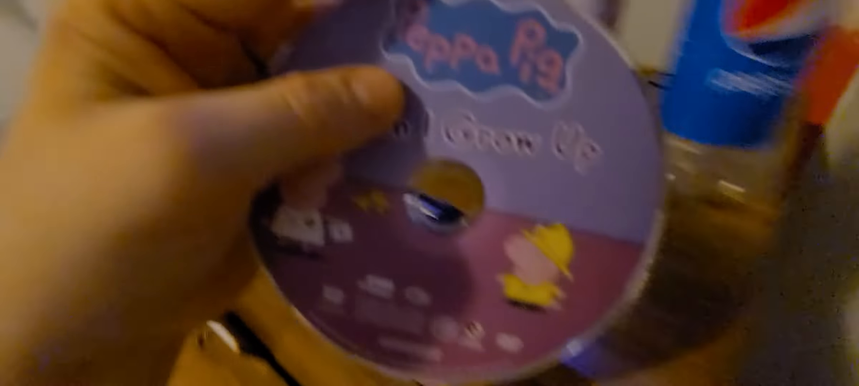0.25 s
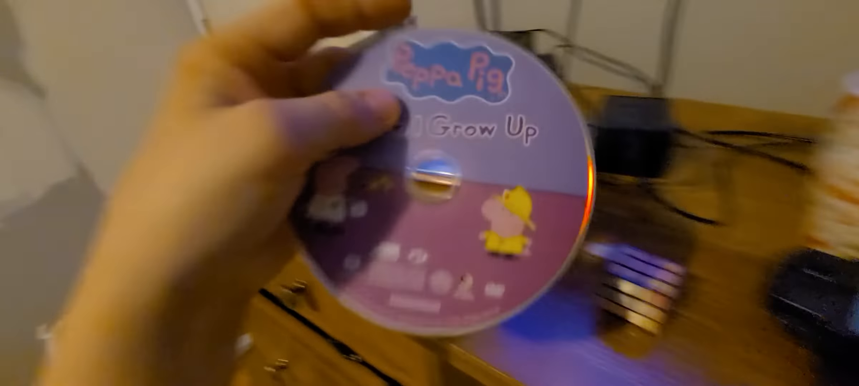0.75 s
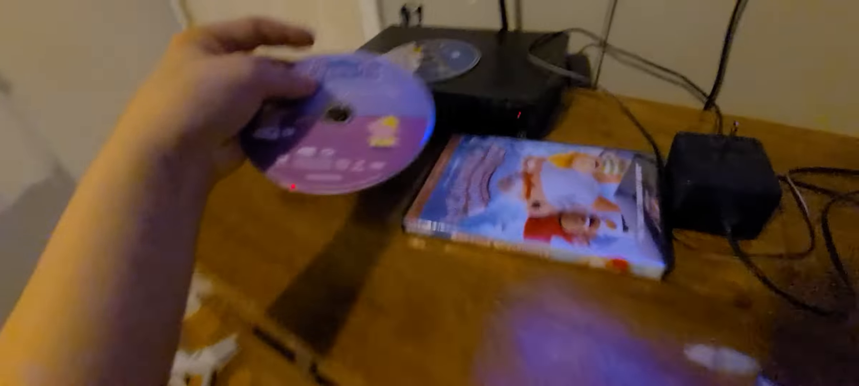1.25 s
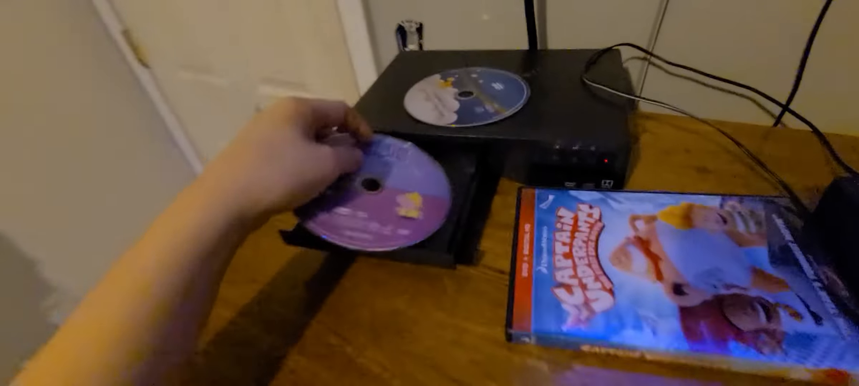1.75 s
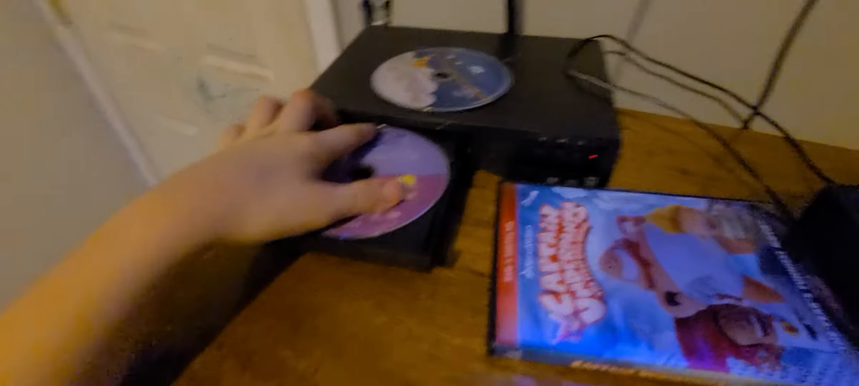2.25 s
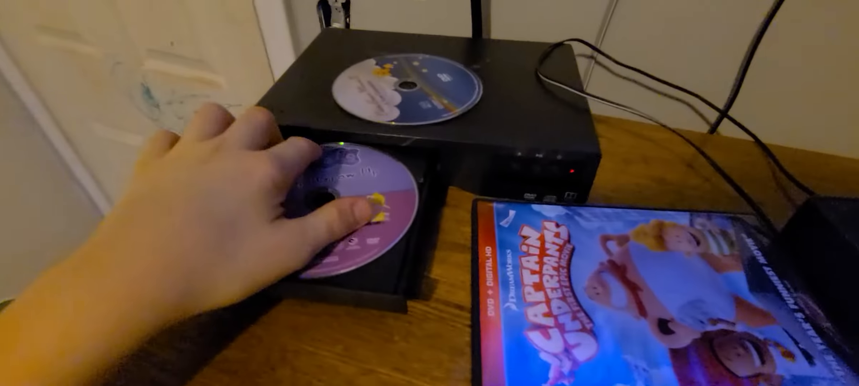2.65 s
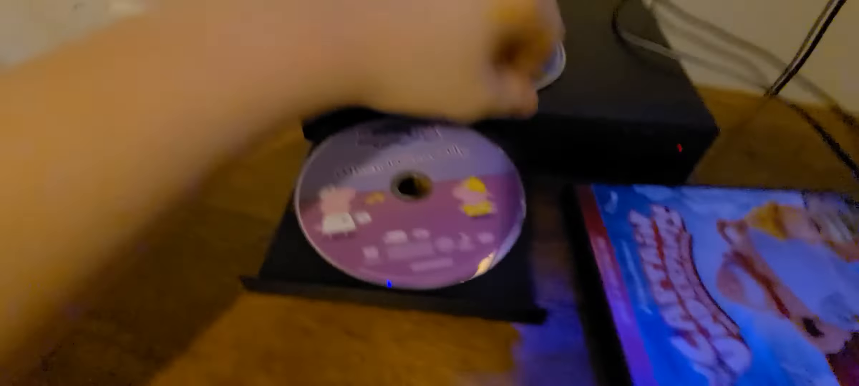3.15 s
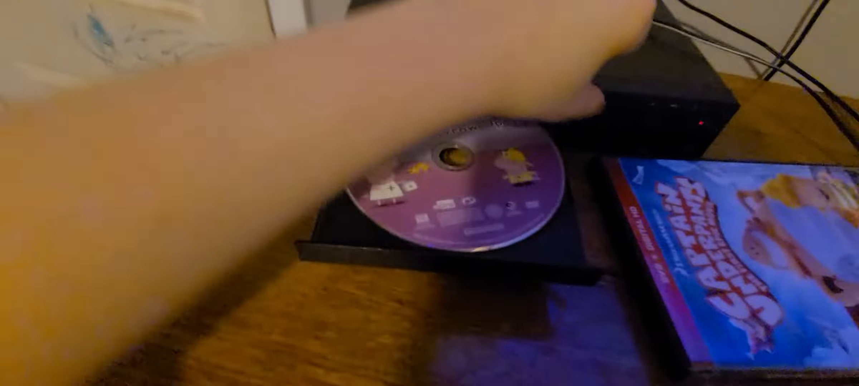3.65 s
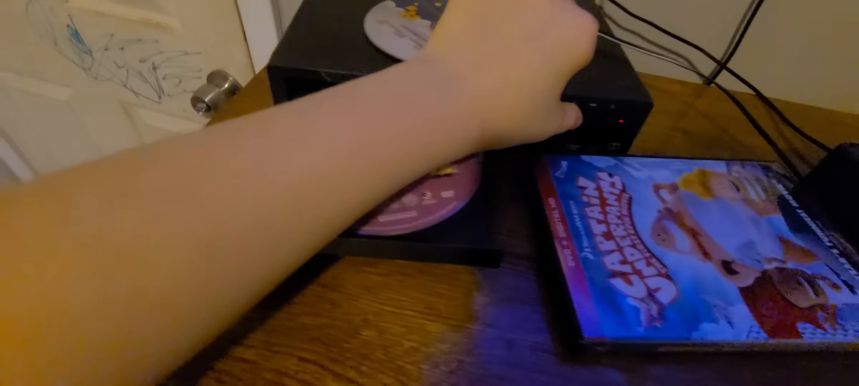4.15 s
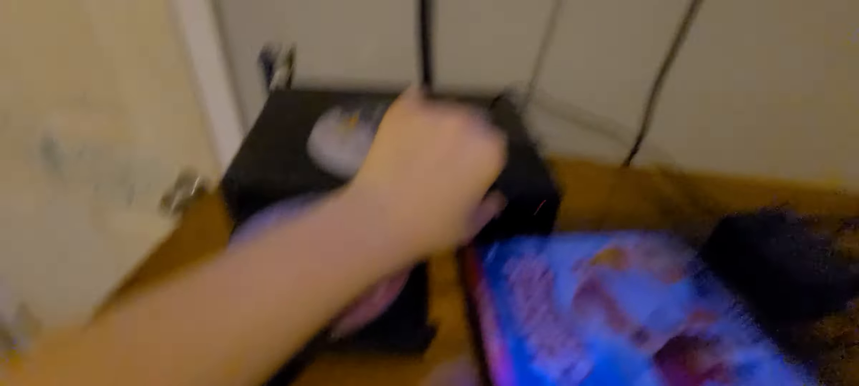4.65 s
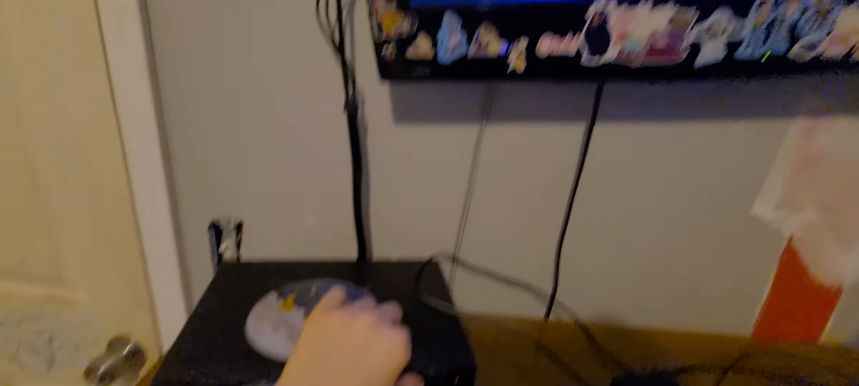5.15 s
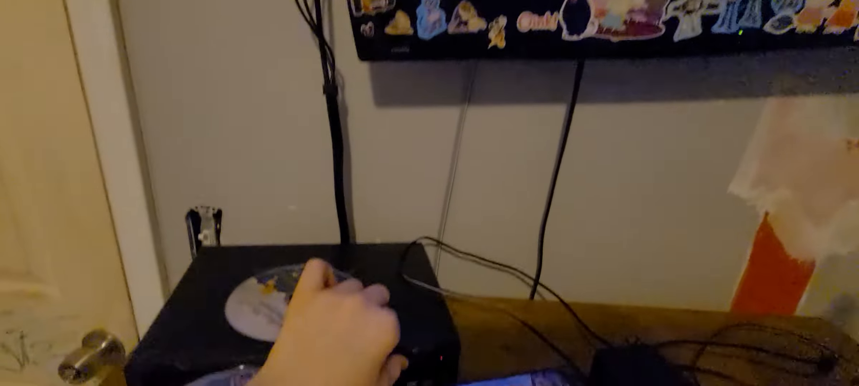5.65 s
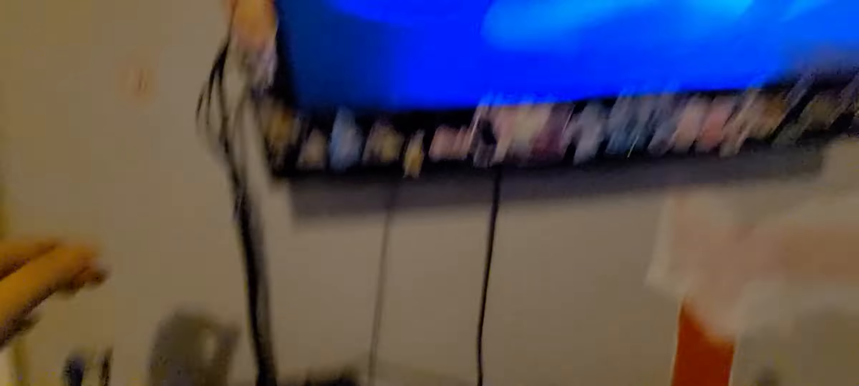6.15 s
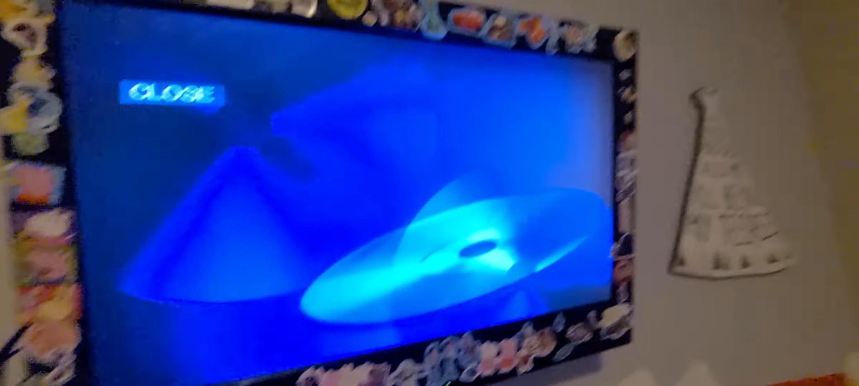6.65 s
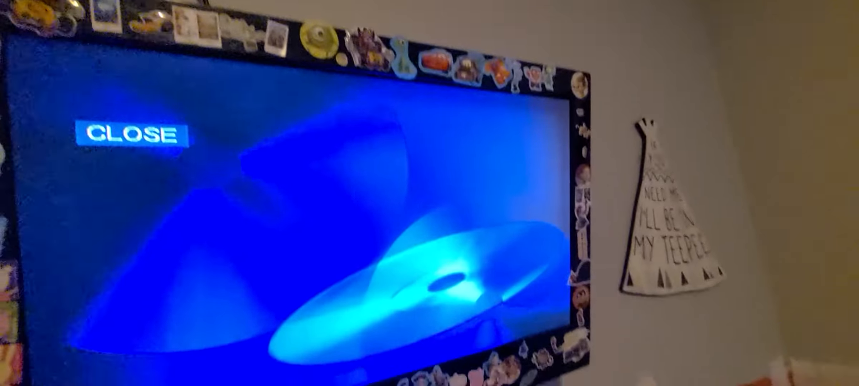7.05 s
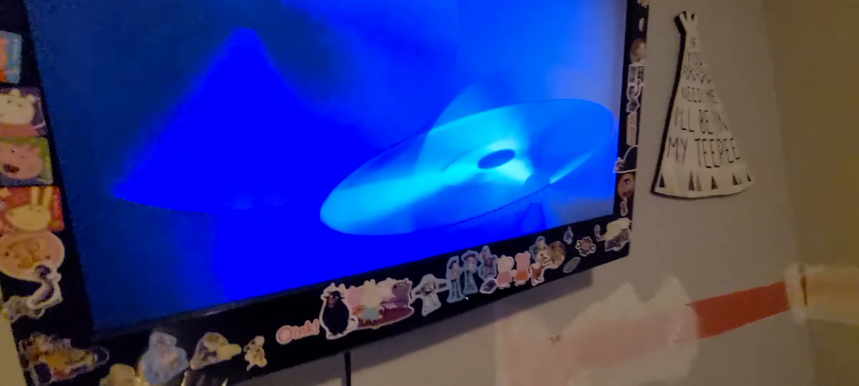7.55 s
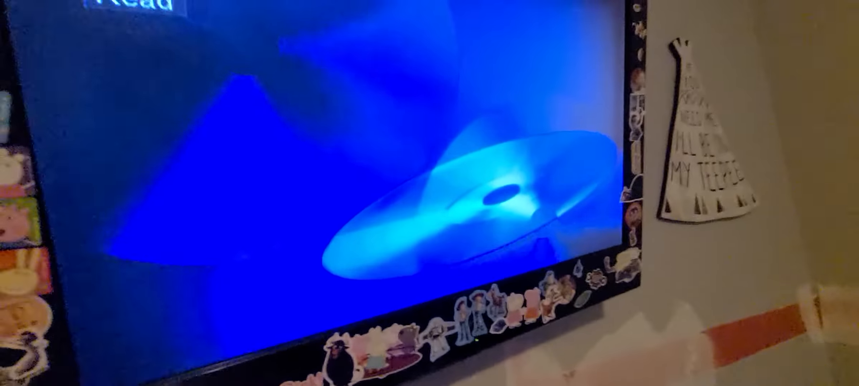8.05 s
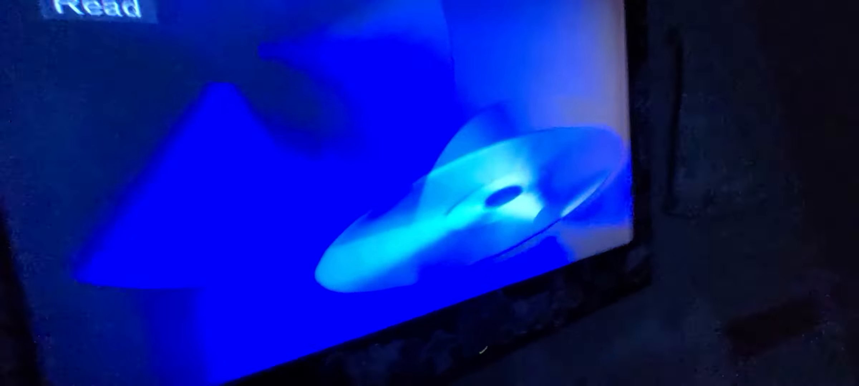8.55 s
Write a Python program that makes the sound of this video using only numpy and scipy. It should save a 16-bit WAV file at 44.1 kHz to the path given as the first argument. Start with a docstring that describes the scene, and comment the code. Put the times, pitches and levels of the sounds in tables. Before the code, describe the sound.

A small, quiet room heard close through a handheld phone, with low rumble, faint mains hum and soft hiss. At the start a disc rubs dryly along fingers, fading within half a second, with light taps and sleeve rustle, strongest near 1.2. At about 1.5 the disc gives a sharp double tick on a plastic tray, scrapes faintly, then from 1.9 to 2.05 clatters in a dense, bright plastic rattle with short ringing. Small taps come near 2.55 and 2.7, a soft cloth brush near 3.2, then near silence. At 5.6 a button snaps down, releasing at 5.74. Around 6.0 to 6.1 the mechanism knocks lightly, and a geared motor whirs, growing louder and slightly lower under load from 6.5, until it stops at about 7.2. Firm clunks land between 7.04 and 7.22. Weaker knocks, faint rustling and tiny taps follow, with a closer scuff at 8.75.

```python
"""A disc slides along fingers and clatters into a player's plastic tray, in a small quiet room.
The clatter is short bursts of noise that set plastic tones ringing; the sliding is countless tiny slips.
A button snaps, a geared motor whines and rattles, and gears, cam and clamp knock inside the player.
Fingers tap, clothes rustle as filtered slips, and a few bumps swing at one clear pitch.
A hand-held phone hears all this through two ports, with room echo, rumble, hum and faint hiss."""
import sys
import numpy as np
from scipy import signal
from scipy.fft import rfft, irfft
from scipy.io import wavfile
from scipy.ndimage import uniform_filter1d

SR = 44100
rng = np.random.default_rng(int(sys.argv[2]) if len(sys.argv) > 2 else 0)


def generate_wav(signal):
    """Clip the signal to [-1, 1] and save it as 16-bit WAV at the path in sys.argv[1]."""
    frames = np.transpose(np.atleast_2d(signal))
    scaled = np.clip(frames, -1, 1) * 32767
    pcm = np.round(scaled).astype(np.int16)
    wavfile.write(sys.argv[1], SR, pcm)


N = 387198
TIME = np.arange(N) / SR  # s

# In the four tables of blows, all levels are relative: each kind of blow shifts them further.
# The disc strikes the tray: (t/s, body level/dB, thud level/dB, tick level/dB)
DISC_HITS = [(1.4775, -16.5, -33.5, -21), (1.5013, -23.5, -35.5, -36.5), (1.773, -30, -48.5, -32),
             (1.9063, -20, -46, -21), (1.9108, -18.5, -39, -23.5), (1.9247, -14.5, -40.5, -19),
             (1.927, -14, -34.5, -15.5), (1.9416, -17, -30.5, -20.5), (1.9443, -14.5, -29, -21),
             (1.9571, -24.5, -34.5, -36), (1.9919, -20.5, -33, -18.5), (1.998, -15, -40.5, -19),
             (2.0073, -16.5, -38, -16), (2.0194, -20, -31, -23), (2.0314, -15, -39.5, -17),
             (2.0546, -26.5, -37.5, -36), (2.1792, -35.5, -55, -33), (2.3317, -39, -50, -34.5)]
# The button snaps down, its spring rattles, it snaps back:
# (t/s, body level/dB, thud level/dB, tick level/dB, chatter fade/s)
BUTTON_SNAPS = [(5.6145, -25, -43, -31, 0.006), (5.64, -38.5, -61, -41, 0.03),
                (5.7362, -21, -38.5, -38, 0.0027), (5.7682, -44, -46.5, -44, 0.0022)]
# Gears, cam and clamp knock inside the player:
# (t/s, body level/dB, thud level/dB, tick level/dB, chatter fade/s)
PLAYER_KNOCKS = [(5.9918, -40, -65, -53, 0.008), (6.0105, -30.5, -53, -58, 0.0099),
                 (6.049, -42, -59, -55, 0.015), (6.0774, -38.5, -52, -38, 0.0038),
                 (6.0876, -29, -46.5, -57, 0.0085), (6.1024, -45, -46.5, -60, 0.011),
                 (6.2774, -41.5, -53, -62, 0.003), (6.787, -38, -57, -44.5, 0.0029),
                 (7.0385, -22.5, -47.5, -40.5, 0.005), (7.069, -25.5, -45.5, -47, 0.01),
                 (7.1367, -31, -43, -45, 0.014), (7.1665, -24.5, -47, -42, 0.0032),
                 (7.2206, -47, -42, -69, 0.0086), (7.3682, -43.5, -61, -80, 0.0049),
                 (7.555, -39.5, -46.5, -50, 0.0085), (7.6704, -46, -59, -57.5, 0.0065),
                 (7.7675, -43, -58, -51.5, 0.0087)]
# Light taps of fingers and plastic: (t/s, body level/dB, thud level/dB, tick level/dB, chatter fade/s)
FINGER_TAPS = [(0.5602, -45, -53, -53, 0.014), (0.677, -45, -80, -48, 0.017),
               (0.7504, -42.5, -56, -56, 0.028), (0.9066, -46, -85, -43, 0.029),
               (1.1266, -46, -53, -47, 0.0065), (2.5508, -49, -43, -59.5, 0.0061),
               (2.7089, -45.5, -58, -55.5, 0.0044), (3.514, -57.5, -59.5, -68, 0.024),
               (3.6496, -68, -88, -64, 0.006), (3.781, -64, -67, -66.5, 0.011),
               (5.1453, -58, -59.5, -69, 0.02), (8.15, -56.5, -54.5, -61.5, 0.013),
               (8.224, -61, -54, -65, 0.011), (8.3754, -58.5, -76, -64, 0.0096),
               (8.5822, -52.5, -69.5, -52, 0.0058), (8.738, -44, -57, -54, 0.031)]
# Bumps and clunks of hand, desk and drive with one clear pitch: (t/s, level/dB, f/Hz, fade/s)
BUMPS = [(0.869, -33, 43.8, 0.071), (1.935, -38, 70, 0.04), (1.98, -47, 85, 0.026), (2.0, -31.5, 207, .025),
         (2.556, -46, 132.5, 0.011), (2.712, -34, 2230, 0.0045), (3.17, -44.5, 34.2, 0.15),
         (6.101, -45, 132, 0.02), (6.108, -36, 308, 0.011), (6.278, -35.5, 134, 0.014),
         (6.279, -30.5, 325, 0.0032), (6.462, -36, 149, 0.0088), (7.165, -43, 140.5, 0.049),
         (7.21, -31, 64.5, 0.05), (7.553, -41.5, 1240, 0.021)]

# Tones that each part rings with, before small pitch shifts: (f/Hz, relative level/dB, time to fall 60 dB/s)
DISC_MODES = [(470, -8.5, 0.065), (623, -6, .08), (966, -1.5, 0.15), (1286, -7.5, .06), (1373, -3.5, .08),
              (1840, -7.5, .05), (2074, -7, 0.061), (2550, -5, 0.13), (2780, -2.5, 0.055), (2975, 1, .05),
              (3250, -4, .05), (3240, -4.5, 0.071), (3820, -6, 0.037), (5400, -8, 0.026), (5720, -5, 0.028),
              (5950, -3, 0.052), (7200, -4, .04)]
BUTTON_MODES = [(1126, -4, 0.017), (1248, 4, 0.039), (1396, 3.5, 0.047), (1670, -4, 0.016),
                (2102, -12, 0.011), (2610, 2.5, 0.0052), (3120, 2.5, 0.014), (3870, 5.5, 0.0081)]
PLAYER_MODES = [(456, -4.5, 0.091), (558, -1.5, 0.031), (976, 1, 0.19), (1161, -0.5, 0.13),
                (1932, 3.5, .07), (2250, -6.5, 0.044), (2820, 2, 0.014), (3200, 1, 0.011), (3690, -18, .03)]

# The disc rubs along skin and tray: (peak t/s, rise/s, fall/s, relative level/dB)
DISC_RUBS = [(0.038, 0.18, .22, -33), (.14, 0.067, .16, -43), (1.61, .04, .1, -46.5),
             (1.74, .1, .06, -45.5), (1.9, .05, .02, -35.5)]
# The sleeve brushes with each move of the arm:
# (peak t/s, rise/s, fall/s, rasp level/dB, fold level/dB, relative fibre hiss level/dB)
SLEEVE_BRUSHES = [(.25, .3, 0.13, -55, -78, -54), (.44, 0.25, 0.25, -57, -61, -72),
                  (.79, 0.1, 0.19, -47, -58, -62.5), (1.155, 0.16, 0.25, -48.5, -61, -47.5),
                  (1.2, 0.094, 0.11, -39, -45.5, -61), (1.36, 0.24, 0.13, -45, -48, -67),
                  (1.66, 0.21, 0.39, -51.5, -54.5, -58), (2.19, 0.21, 0.3, -52.5, -54, -56),
                  (2.28, .06, .19, -53.5, -51.5, -80), (2.78, 0.2, 0.16, -72, -69, -74.5),
                  (3.1, 0.18, 0.31, -55.5, -53.5, -57), (3.179, 0.15, 0.11, -44, -43, -71),
                  (3.31, 0.11, 0.16, -62, -52.5, -90), (3.6, .1, 0.22, -69, -63.5, -87),
                  (4.84, 0.05, .07, -78, -80, -65.5), (6.08, .18, .25, -66, -67, -67),
                  (6.5, 0.47, 0.46, -64, -57, -66), (7.3, .06, 0.1, -59, -53, -90),
                  (7.62, 0.24, .15, -60.5, -60, -76), (7.8, 0.2, 0.11, -57, -53, -63),
                  (7.9, 0.16, 0.09, -58, -70, -59.5), (8.24, 0.12, 0.27, -66.5, -67.5, -83),
                  (8.63, .05, 0.21, -59, -64, -73), (8.77, 0.057, 0.086, -47, -53, -70)]
# Load on the tray motor, heaviest while it lifts the clamp: (t/s, load/0-1)
MOTOR_LOAD = [(6.2, 0), (6.4, .3), (6.57, 0.83), (6.7, 0.6), (7.0, 0.65), (7.06, .97), (7.22, 0.81)]

# Tone colour of each rubbing or rattling surface: (f/Hz, relative level/dB)
SLIDE_COLOUR = [(100, -9.5), (700, -9.5), (1700, -2), (2700, -5), (3100, 5), (3500, -5), (4000, -4),
                (4800, -10), (5900, -5.5), (6400, -11.5), (15000, -20.5)]
GEAR_COLOUR = [(80, 5), (250, -2), (450, -2), (600, 1), (800, -7), (1450, 0), (1850, -1), (2250, 0),
               (2650, -6.5), (3200, -5), (4500, -14), (8000, -16), (16000, -17)]
CLOTH_COLOUR = [(500, -20.5), (1200, -6.5), (1650, -2), (2080, 6), (2500, -2.5), (3100, -1.5), (4500, -7),
                (7000, -13.5), (11000, -23.5)]
FOLD_COLOUR = [(60, -8), (250, 0.5), (450, -2.5), (800, -8.5), (1400, -9.5), (3000, -40.5)]
FIBRE_COLOUR = [(2500, -21), (6000, 1), (9000, -1), (12500, 3.5), (16000, -1.5)]
# Tone colour of the rumble and hiss: (f/Hz, relative level/dB)
AIR_COLOUR = [(15, -0.5), (30, 4.5), (75, -4), (130, -3), (200, -9), (310, -16.5), (500, -24.5), (800, -36),
              (1400, -32), (3000, -35), (4500, -39.5), (6500, -32), (9000, -44), (16000, -34)]
# Mains hum around its slow wavering: (f/Hz, level/dB)
HUM = [(120, -61), (180, -66), (240, -71)]
# How long the room rings: (f/Hz, time to fall 60 dB/s)
ROOM_T60 = [(150, 0.76), (1000, 0.35), (3000, 0.3), (7000, 0.26), (15000, 0.16)]
# Tone of both microphone ports: (f/Hz, gain level/dB)
MICROPHONE = [(5000, 0.5), (6000, 2.5), (7250, 1), (8000, -5), (10000, -3.5), (12200, -1.5), (16000, -7)]
# How much louder the left port is than the right: (f/Hz, level/dB)
LEFT_MINUS_RIGHT = [(40, -2.5), (120, -.5), (650, 1), (1600, 0), (2400, -7), (7000, -8), (8500, -1.5),
                    (15000, -2.5)]
# How much of the difference between the two sides is kept: (f/Hz, gain level/dB)
PORT_DIFFERENCE = [(40, -8.5), (130, -11), (300, -11), (640, -4.5), (1400, -1), (2500, 1.5), (6000, -0.5)]

# Every strike of the disc fades equally fast (s)
DISC_CHATTER_S = 0.003
# A stroke is this far down (dB) at the ends of its rise and fall; the power rounds its crest
STROKE_DROP_DB, STROKE_ROUNDING = 21, 1.4
# The motor's sound fades in and dies away (s)
MOTOR_ON_S, MOTOR_OFF_S, FADE_IN_S, FADE_OUT_S = 6.08, 7.23, 0.03, 0.018
# Shaft turns per second with no load, and how far full load drags them down (Hz)
SHAFT_HZ, SAG_HZ = 71.14, 8
# Levels with no load, and what full load adds (dB)
WHINE_DB, WHINE_LOAD_DB = -70, 22
RATTLE_DB, RATTLE_LOAD_DB = -61.5, 18.5
# How much earlier the left port hears the tray and the player (s), and how alike the ports hear them (0-1)
TRAY_LEAD_S, PLAYER_LEAD_S, LIKENESS = 0.00016, 0.00028, 0.74
# Unevenness of the single touches within a chatter (dB)
CHATTER_SCATTER_DB = 2.5


def disc():
    """The disc clatters on the tray: each strike is a noise burst that rings the disc."""
    hits = [(*row, DISC_CHATTER_S) for row in DISC_HITS]
    clatter = contacts(hits, DISC_MODES, ring_db=-9, rise_s=0.00088,
                       body_db=-4.5, thud_db=8.5, tick_db=-0.5, sub_db=-3.5)
    return ports(clatter, TRAY_LEAD_S)


def slide():
    """The disc rubs along the fingers and the tray's rim; pressing harder makes its slips louder."""
    power = sum((undb(db) * stroke(s, rise_s, fall_s)) ** 2 for s, rise_s, fall_s, db in DISC_RUBS)
    slips = friction(SLIDE_COLOUR, grain_rate=7000, grain_db=4, flicker_db=2)
    return slips * np.sqrt(power) * undb(-1)


def button():
    """The switch snaps and briefly rings the front panel."""
    snaps = contacts(BUTTON_SNAPS, BUTTON_MODES, ring_db=-5, rise_s=0.00186,
                     body_db=0.5, thud_db=9.5, tick_db=6.5, sub_db=-21)
    return ports(snaps, TRAY_LEAD_S)


def loader():
    """The loading mechanism knocks, and the casing smears each knock with its ringing."""
    knocks = contacts(PLAYER_KNOCKS, PLAYER_MODES, ring_db=-10.5, rise_s=0.00044,
                      body_db=-4, thud_db=14, tick_db=1.5, sub_db=9)
    return ports(knocks, PLAYER_LEAD_S)


def motor():
    """An eight-tooth pinion whines and gears clatter alike every turn; load makes both slower and louder."""
    load = np.interp(TIME, *np.transpose(MOTOR_LOAD))
    fade_in = np.clip((TIME - MOTOR_ON_S) / FADE_IN_S, 0, 1)
    fade_out = np.exp(-np.maximum(TIME - MOTOR_OFF_S, 0) / FADE_OUT_S)
    shaft_hz = (SHAFT_HZ - SAG_HZ * load) * (1 + 0.005 * walk(30))
    turns = np.cumsum(shaft_hz) / SR
    # a wobble once a turn puts a weaker tone on each side of the tooth rate: (waves per turn, dB)
    partials = [(7, -12), (8, 0), (9, -3)]
    whine = unit(sum(undb(db + 3 * walk(22)) * np.sin(2 * np.pi * order * turns)
                     for order, db in partials))
    # the same strip of noise is played once per turn
    size = int(SR / SHAFT_HZ)
    one_turn = rng.standard_normal((2, size))
    place = turns % 1 * size
    clatter = np.array([np.interp(place, np.arange(size), teeth) for teeth in one_turn])
    slipping = friction(GEAR_COLOUR, grain_rate=3400, grain_db=3, flicker_db=1.5)
    gears = unit(unit(colour(clatter, GEAR_COLOUR)) + undb(-4) * slipping)
    gears = ports(gears, PLAYER_LEAD_S)
    whine = whine * undb(WHINE_DB + WHINE_LOAD_DB * load)
    gears = gears * undb(RATTLE_DB + RATTLE_LOAD_DB * load)
    return fade_in * fade_out * (whine + gears)


def fingers():
    """Small taps and scuffs make hollow plastic ring."""
    return contacts(FINGER_TAPS, PLAYER_MODES, ring_db=-12, rise_s=0.003,
                    body_db=6.5, thud_db=13.5, tick_db=7, sub_db=-11)


def cloth():
    """Fabric slips over fabric: a rasp, dull folds and the hiss of fibres."""
    moves = np.array([stroke(*row[:3]) for row in SLEEVE_BRUSHES])
    gains = undb(np.array(SLEEVE_BRUSHES)[:, 3:].T)
    # overlapping moves add their power
    rasp, folds, fibres = np.sqrt(gains ** 2 @ moves ** 2)
    rasp = rasp * friction(CLOTH_COLOUR, grain_rate=4000, grain_db=2.5, flicker_db=2)
    folds = folds * friction(FOLD_COLOUR, grain_rate=2500, grain_db=1.5, flicker_db=1.5)
    fibres = fibres * friction(FIBRE_COLOUR, grain_rate=9000, grain_db=1.5, flicker_db=1.2)
    return rasp + folds + undb(8) * fibres


def bumps():
    """A short push makes one part swing at its own pitch and die away."""
    out, t = np.zeros((2, N)), TIME[:SR // 2]
    for s, db, hz, decay_s in BUMPS:
        shape = np.exp(-t / decay_s) * (1 - np.exp(-t / 0.0013))
        swing = undb(db) * np.sin(2 * np.pi * hz * t) * shape
        add(out, s, swing[None])
    return out


def background():
    """Filtered noise gives low rumble and smooth hiss; gently wavering sines give mains hum."""
    air = unit(colour(rng.standard_normal((2, N)), AIR_COLOUR)) * undb(-51)
    hum = sum(undb(db + 1.2 * walk(13)) * np.sqrt(2) * np.sin(2 * np.pi * hz * TIME) for hz, db in HUM)
    return air + hum


def contacts(table, modes, ring_db, rise_s, body_db, thud_db, tick_db, sub_db):
    """Each blow is a short dying chatter, coloured by how heavy and how sharp it is."""
    out, t = np.zeros((2, N)), TIME[:8192]
    for s, db, thud, tick, chatter_s in table:
        shape = np.exp(-t / max(chatter_s, 1e-3)) * (1 - np.exp(-t / rise_s))
        scatter = undb(CHATTER_SCATTER_DB * rng.standard_normal(len(t)))
        touches = rng.standard_normal((2, len(t))) * scatter
        # every burst starts with the energy of 12 ms at rms 1
        burst = unit(touches * shape) * np.sqrt(0.012 * SR / len(t))
        low, body, high = thud + thud_db, db + body_db, tick + tick_db
        blow = colour(burst, [(60, low + sub_db), (220, low), (680, low), (1100, body),
                              (2800, body), (5400, high), (15000, high - 4)])
        add(out, s, ring(blow, modes, ring_db))
    return out


def ring(x, modes, ring_db, detune=0.019):
    """A plastic part passes on the contact and adds fading tones, shifted a little by how it is held."""
    t = TIME[:x.shape[1]]
    hz, db, t60 = np.transpose(modes)[:, :, None, None]
    pitch = hz * (1 + detune * rng.standard_normal(hz.shape))
    phase = rng.uniform(0, np.pi, (len(modes), 2, 1))
    # dividing by the root of t60 keeps long tones from gaining energy
    fade = undb(db - 60 * t / t60) / np.sqrt(t60)
    tail = np.sum(fade * np.sin(2 * np.pi * pitch * t + phase), axis=0)
    return x + undb(ring_db) * convolve(x, unit(tail) / np.sqrt(len(t)))


def friction(points, grain_rate, grain_db, flicker_db):
    """Rubbing is countless tiny slips (grain_rate per second) of uneven size, with a flickering level."""
    slips = rng.random((2, N)) < grain_rate / SR
    sizes = undb(grain_db * rng.standard_normal((2, N)))
    grains = slips * sizes * rng.standard_normal((2, N))
    return unit(colour(grains, points)) * undb(flicker_db * walk(50))


def stroke(peak_s, rise_s, fall_s):
    """Gain of one rubbing move: it gathers speed, peaks and slows."""
    away = np.maximum((peak_s - TIME) / rise_s, (TIME - peak_s) / fall_s)
    return undb(-STROKE_DROP_DB * np.minimum(np.abs(away), 10) ** STROKE_ROUNDING)


def ports(x, lead_s):
    """Most of a near sound reaches both ports alike, the right one a little later."""
    delayed = np.roll(x[0], int(round(lead_s * SR)))
    right = LIKENESS * delayed + np.sqrt(1 - LIKENESS ** 2) * x[1]
    return np.array([x[0], right])


def room(x, build_s):
    """Blurred echo of a small room that mixes both sides; the treble dies first."""
    t = TIME[:int(SR * 0.7)]
    noise = rfft(rng.standard_normal((4, len(t))))
    hz = np.arange(noise.shape[1]) * SR / len(t)
    octave = np.round(np.log2(np.clip(hz, 125, 16000) / 125))
    tail = 0
    for k in np.unique(octave):
        band = octave == k
        t60 = on_log_axis(hz[band].mean(), ROOM_T60)
        tail = tail + irfft(noise * band, len(t)) * undb(-60 * t / t60)
    tail = unit(tail * (1 - np.exp(-t / build_s))) / np.sqrt(2 * len(t))
    # two tails keep their side and two cross over
    return convolve(x, tail[:2]) + convolve(x[::-1], tail[2:])


def undb(db):
    """Turn decibels into gain."""
    return 10 ** (np.asarray(db) / 20)


def unit(x):
    """Scale to rms 1."""
    return x / np.sqrt(np.mean(x ** 2) + 1e-20)


def on_log_axis(hz, points):
    """Read (f/Hz, value) points on a log-frequency axis."""
    f, value = np.transpose(points)
    return np.interp(np.log(hz + 1), np.log(f), value)


def colour(x, points):
    """Filter through (f/Hz, level/dB) points without sounding early, using the cepstrum of the gain."""
    size = 4096
    hz = np.arange(size // 2 + 1) * SR / size
    cepstrum = irfft(np.log(undb(on_log_axis(hz, points))))
    # folding the second half onto the first makes the filter react at once
    cepstrum[1:size // 2] *= 2
    cepstrum[size // 2 + 1:] = 0
    response = irfft(np.exp(rfft(cepstrum)))
    return convolve(x, response[None])


def convolve(x, response):
    """Pass each channel through a response, keeping its length."""
    return signal.fftconvolve(x, response, axes=1)[:, :x.shape[1]]


def add(out, s, x):
    """Mix x into out from time s (seconds)."""
    i = max(int(s * SR), 0)
    out[:, i:i + x.shape[1]] += x[:, :N - i]


def walk(rate):
    """Slow chance: smoothed random levels, rate new ones per second, with a spread near 1."""
    k = max(int(SR / rate), 1)
    steps = np.repeat(rng.standard_normal(N // k + 1), k)
    return unit(uniform_filter1d(steps, k)[:N])


def scene():
    """Most sources reach the phone directly and by way of the room; bumps and background only directly."""
    # (source, room share in dB)
    struck = [(disc, -3), (button, -8), (loader, -1.5), (fingers, -3)]
    steady = [(slide(), -3), (motor(), -5), (cloth(), -6)]
    direct = sum(blows() for blows, _ in struck) + sum(x for x, _ in steady)
    # a struck part radiates differently in each direction, so the walls hear a chatter of their own
    to_walls = sum(blows() * undb(db) for blows, db in struck)
    to_walls = to_walls + sum(x * undb(db) for x, db in steady)
    return direct + room(to_walls, build_s=0.0015) + bumps() + background()


def record(dry):
    """Two ports hear the bass nearly alike; the right one is brighter, and the top is cut."""
    mid = (dry[:1] + dry[1:]) / 2
    side = colour((dry[:1] - dry[1:]) / 2, PORT_DIFFERENCE)
    left = colour(mid + side, [(hz, db / 2) for hz, db in LEFT_MINUS_RIGHT])
    right = colour(mid - side, [(hz, -db / 2) for hz, db in LEFT_MINUS_RIGHT])
    heard = colour(np.vstack([left, right]), MICROPHONE)
    low_pass = signal.ellip(10, 0.2, 80, 16100, fs=SR, output="sos")  # cut-off in Hz
    return signal.sosfilt(low_pass, heard)


dry = scene()
out = record(dry)
generate_wav(out)
```